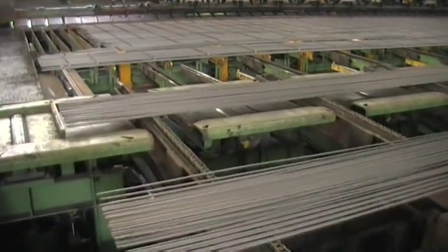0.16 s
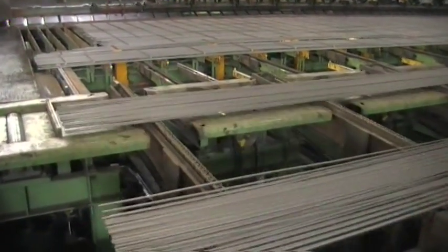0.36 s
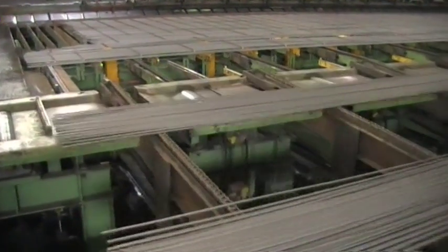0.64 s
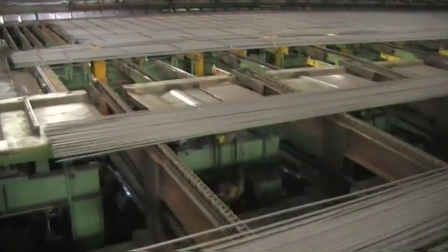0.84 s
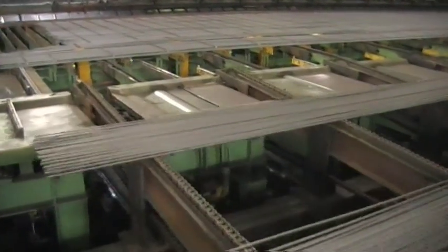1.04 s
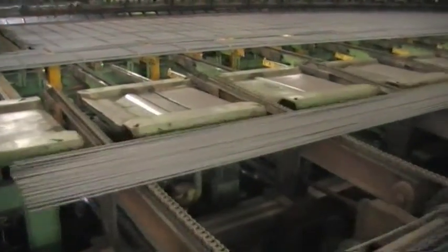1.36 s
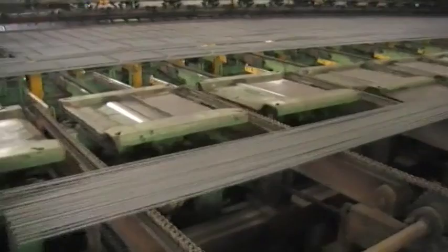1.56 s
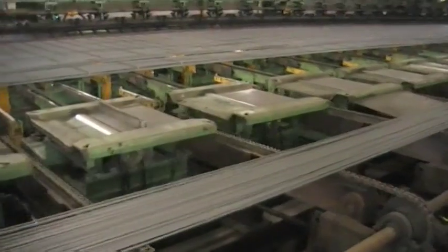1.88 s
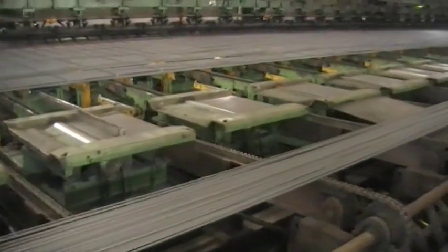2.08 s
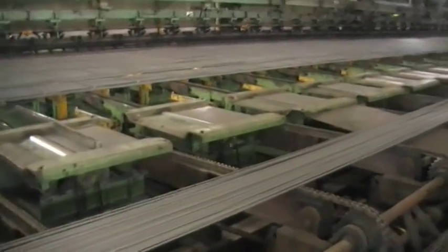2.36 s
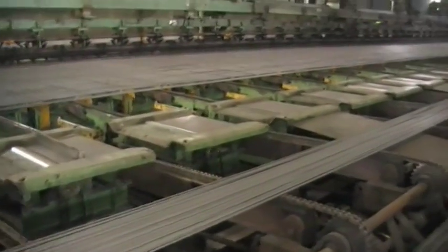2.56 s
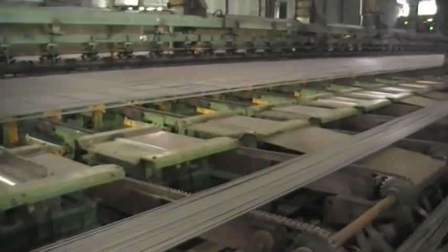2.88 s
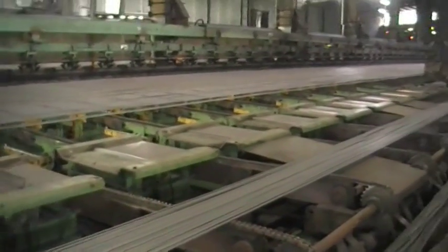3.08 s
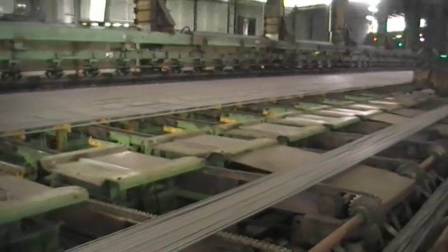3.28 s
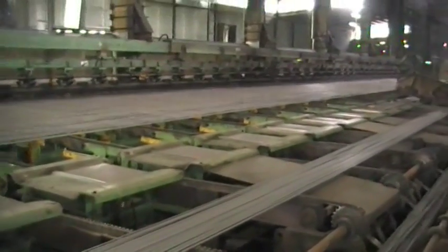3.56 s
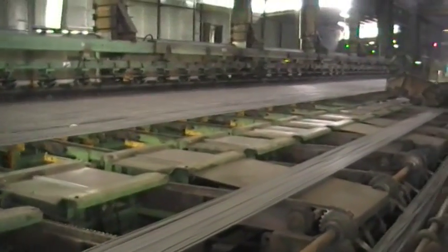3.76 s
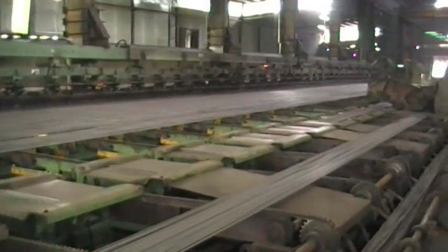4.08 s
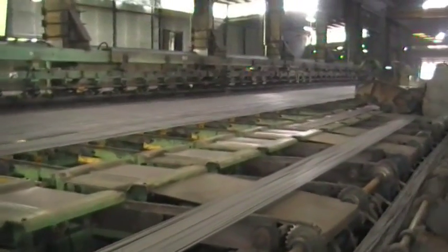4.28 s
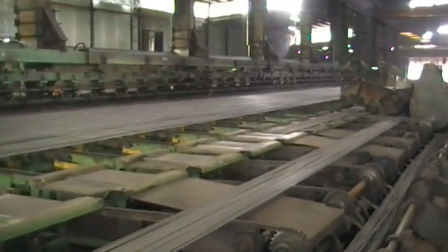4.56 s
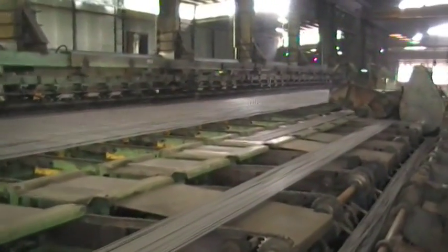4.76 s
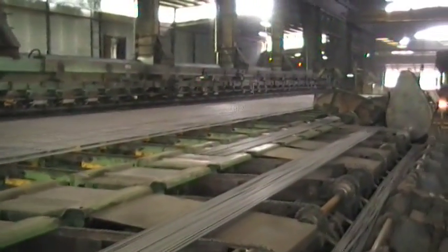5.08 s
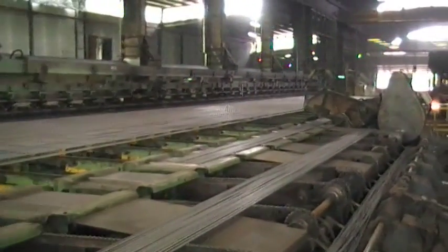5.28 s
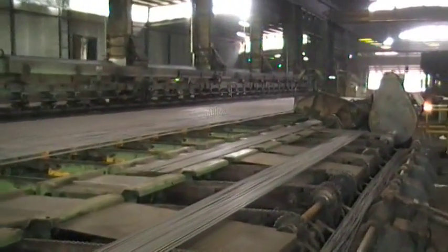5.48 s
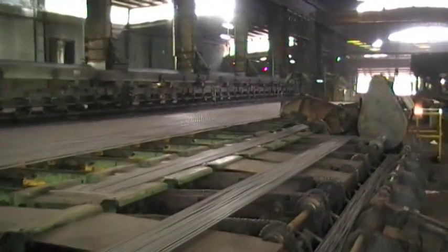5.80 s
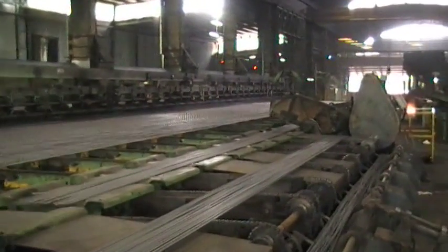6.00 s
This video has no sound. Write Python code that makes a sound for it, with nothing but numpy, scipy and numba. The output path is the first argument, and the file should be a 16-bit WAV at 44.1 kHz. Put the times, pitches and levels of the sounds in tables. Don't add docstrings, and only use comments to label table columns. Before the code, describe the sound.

Heavy factory roar with metallic clanks; an air valve blasts close and distorted around one to two seconds, then a steady high hiss resumes.

```python
import sys
import numpy as np
from scipy import signal
from scipy.fft import rfft, irfft, next_fast_len
from scipy.io import wavfile
from scipy.ndimage import uniform_filter1d
from numba import njit

SR = 44100
rng = np.random.default_rng(int(sys.argv[2]) if len(sys.argv) > 2 else 0)


def bounce(signal):
    frames = np.transpose(np.atleast_2d(signal))
    limited = np.clip(frames, -1, 1)
    pcm = np.round(limited * 32767).astype(np.int16)
    wavfile.write(sys.argv[1], SR, pcm)


def gain_from_db(level_db):
    decades = np.asarray(level_db, float) / 20
    return 10 ** decades


N = 270333
T, M = np.arange(N) / SR, next_fast_len(N)
HZ = np.fft.rfftfreq(M, 1 / SR) + 1

# time_s, level_db
AIR_FLOW = [(0.0, -38.5), (0.23, -35), (0.28, -28), (0.38, -29), (0.43, -25), (0.7, -20), (0.92, -19),
            (1.01, -18), (1.5, -19), (1.72, -18.5), (1.79, -21.5), (1.94, -25.5), (1.96, -21.5),
            (2.17, -32), (2.29, -34.5), (2.82, -22.5), (3.14, -21.5), (6.13, -19.5)]
# time_s, opening (0-1)
VALVE_OPENING = [(0, .05), (.25, 0.35), (.965, 0.54), (.99, 0.99), (1.5, 1), (1.72, 0.85), (1.94, 0.49),
                 (2.25, 0), (6.13, 0.13)]
# time_s, gain_db
RECORDER_GAIN = [(0, 0.5), (.34, 2.5), (.83, 2), (.975, 0), (.995, -8), (1.11, -7.5), (1.4, -7.5),
                 (1.65, -6.5), (1.85, -1.5), (1.92, -1.5), (1.95, -5), (1.965, -1), (2.3, -3), (2.55, -1),
                 (3.1, 1), (4.4, -0.5), (4.6, -0.5), (6.13, 0)]
CLATTER_S = 0.007


def curves(table):
    s, *columns = np.transpose(table)
    return [np.interp(T, s, c) for c in columns]


def on_log(hz, table, axis=1):
    table = np.array(table, float)
    return np.interp(np.log(hz), np.log(table[:, 0]), table[:, axis])


def unit(x):
    return x / np.sqrt(np.mean(x ** 2))


def noise():
    return rng.standard_normal(N)


def walk(rate):
    k = int(SR / rate)
    held = np.repeat(rng.standard_normal(N // k + 1), k)
    return 1.4 * uniform_filter1d(uniform_filter1d(held, k), k)[:N]


@njit
def ring(start, hz, t60, size):
    y = np.zeros(N)
    for k in range(len(start)):
        p = np.exp(2j * np.pi * hz[k] / SR - np.log(1000) / (t60[k] * SR))
        z = size[k] + 0j
        for i in range(max(start[k], 0), min(N, start[k] + int(t60[k] * SR))):
            y[i] += z.imag
            z *= p
    return y


def strike(start_s, hz, t60, size_db):
    start = (start_s * SR).astype(np.int64)
    return ring(start.ravel(), hz.ravel(), t60.ravel(), gain_from_db(size_db).ravel())


def jingle(count, lo_hz, hi_hz, t60, scatter_db):
    u = rng.random((count, 4)).T
    return unit(strike(u[0] * N / SR, lo_hz + (hi_hz - lo_hz) * u[1], t60 * (.5 + u[2]), scatter_db * u[3]))


def bands(x, colour, level_db, shared_db, own_db):
    spectrum = rfft(np.array([x, np.roll(x, N // 2)]), M) * gain_from_db(on_log(HZ, colour))
    spectrum = spectrum / np.sqrt(np.sum(abs(spectrum) ** 2) / N / M)
    out, swell = 0, shared_db * walk(6.8)
    octaves = np.log2(colour[-1][0] / colour[0][0])
    for hz in colour[0][0] * 2 ** np.arange(0, octaves + .5, .5):
        mask = np.clip(1 - 2 * abs(np.log2(HZ / hz)), 0, 1)
        out = out + irfft(spectrum * mask, M)[:, :N] * gain_from_db(level_db(hz) + swell + own_db * walk(10.0))
    return out


def machines():
    # freq_hz, density_db (per Hz)
    drone_colour = [(18, -71), (30, -74), (65, -30.5), (252, -4.5), (425, -4), (482, -5.5), (672, -2.5),
                    (811, -4.5), (1260, -6), (1370, -5), (2400, -6.5), (2960, -8.5), (4400, -7.5),
                    (5720, -17.5), (9680, -120)]
    # centre_hz, level_db, per_gain (dB per dB), per_shake (dB per dB)
    mechanisms = [
        (335, -22.5, 1.9, 0),
        (680, -24, 1.03, .5),
        (1470, -25, 0.94, 0.72),
        (3560, -26, 0.66, 0.33),
    ]
    # time_s, shake_db
    bar_shake = [(0, -1.5), (.33, 0.5), (.39, 7.5), (.92, 3), (1.84, -6), (1.88, 7), (2.02, 14), (2.25, -5),
                 (2.6, -4), (2.97, 1), (3.4, 2.5), (3.83, -3.5), (4.37, 3.5), (4.6, 1.5), (5.16, -3.5),
                 (5.45, 6), (5.77, -3), (6.05, 0)]
    centre_hz, db, per_gain, per_shake = np.transpose(mechanisms)[:, :, None]
    layers = db + per_gain * curves(RECORDER_GAIN)[0] + per_shake * curves(bar_shake)[0]
    layers[3] += 0.42 * (curves(AIR_FLOW)[0] + 21) + 7.5 * curves(VALVE_OPENING)[0] ** 3

    def level_db(hz):
        shares = [np.interp(np.log(hz), np.log(centre_hz[:, 0]), row) for row in np.eye(4)]
        return shares @ layers

    source = noise() + 0.33 * jingle(count=6000, lo_hz=301.7, hi_hz=5467, t60=0.18, scatter_db=1.5)
    return bands(source, drone_colour, level_db, 1.0, 0.079)


def clanks(count=60):
    # start_s, peak_db, main_hz, crack_db (above 2.5 kHz)
    free_blows = [(0.114, -21, 640, -7), (0.359, -15, 1004, -13), (0.379, -10, 1325, -7.5),
                  (0.459, -16.5, 1480, -3), (0.549, -14, 1340, -6), (1.864, -11, 1028, -9),
                  (1.888, -6.5, 1165, -18), (1.964, -13, 1600, -9), (1.957, -5.5, 980, -10),
                  (2.009, -11, 734, -13), (2.034, -16, 930, -20), (2.976, -11.5, 686, -13),
                  (3.199, -16, 723, -3), (3.361, -11, 1480, -15), (3.409, -12, 1320, -10),
                  (3.439, -14, 616, -19), (4.118, -15.5, 720, -9), (4.199, -13.5, 640, -21),
                  (4.374, -11.5, 1380, -5), (4.459, -11.5, 576, -19), (4.519, -13.5, 652, -18),
                  (5.943, -15, 865, -6), (6.039, -16, 557, -9)]
    # start_s, peak_db, main_hz, crack_db (above 2.5 kHz)
    loaded_blows = [(0.489, -18, 734, -11), (1.989, -6, 1550, -9), (2.577, -15.5, 1660, -8.5),
                    (2.782, -15, 1260, -5), (2.799, -13.5, 1125, -10), (3.387, -9, 2080, -10),
                    (3.748, -6.5, 1805, -20), (4.089, -15.5, 766, -7), (4.359, -13, 1680, -4),
                    (5.283, -12, 657, -27), (5.369, -17, 750, -17), (5.419, -17, 590, -16),
                    (5.519, -15, 715, -5), (5.679, -17, 2030, -23.5)]
    s, db, hz, crack_db = np.transpose(free_blows + loaded_blows)[:, :, None]
    t60 = np.repeat([0.15, 0.082], [len(free_blows), len(loaded_blows)])[:, None]
    u = rng.random((len(s), 3, count))
    frame_hz = 560 * 17. ** ((np.arange(count) + u[:, 0]) / count)
    apart_db = 3.85 * abs(np.log2(np.minimum(frame_hz, 2500) / hz))
    bright_db = np.clip(np.log2(frame_hz / 1800), 0, 1) * (crack_db + 8.5)
    size_db = np.c_[db - 11.5, db - 14 - apart_db + bright_db - 8 * u[:, 1]]
    modes_hz = np.c_[hz, frame_hz]
    decay_s = t60 * (hz / modes_hz) ** 0.18
    start_s = s + np.c_[0 * s, CLATTER_S * u[:, 2] ** 2]
    blows = strike(start_s, modes_hz, decay_s, size_db)
    return signal.sosfilt(signal.butter(2, 300, "high", fs=SR, output="sos"), blows)


def thuds(count=8):
    # start_s, level_db
    floor_blows = [
        (3.39, -31),
        (3.749, -22),
        (4.36, -28),
    ]
    s, db = np.transpose(floor_blows)[:, :, None]
    u = rng.random((len(s), 2, count))
    hz = 210 * 3.34 ** ((np.arange(count) + u[:, 0]) / count)
    beams = strike(s + CLATTER_S * u[:, 1], hz, 0.055 + 0 * hz, db + 0 * hz)
    return signal.sosfilt(signal.butter(4, 180, "high", fs=SR, output="sos"), beams)


def pings():
    # start_s, start_hz, end_hz, level_db, length_s
    squeaks = [(.225, 10400, 11000, -39, .025), (0.286, 3070, 3100, -29, 0.037),
               (.487, 15400, 14600, -40, .04), (0.98, 4300, 4330, -26, 0.016),
               (1.624, 1694, 1697, -37, 0.256), (2.02, 4650, 4560, -32, 0.028),
               (2.03, 6200, 6050, -36, 0.023), (2.023, 7500, 7440, -27, .03),
               (2.077, 7800, 7750, -27, 0.026), (2.081, 5150, 5150, -31, 0.028),
               (3.36, 3000, 3000, -24, .012), (3.361, 2450, 2500, -25, .014),
               (3.387, 2670, 2700, -23, 0.027), (5.668, 2000, 1960, -29, 0.031),
               (5.673, 2550, 2580, -32, .03), (5.942, 850, 820, -30, 0.085)]
    out, waver_hz = np.zeros(N), 30 * walk(70)
    for s, hz0, hz1, db, length in squeaks:
        u = np.clip((T - s) / length, 0, 1)
        hz = hz0 + (hz1 - hz0) * u + waver_hz
        envelope = np.sqrt(2) * np.sin(np.pi * u ** 0.5)
        out += gain_from_db(db) * envelope * np.sin(2 * np.pi * np.cumsum(hz) / SR)
    return out


def hiss():
    # freq_hz, density_db (per Hz)
    jet_colour = [(2710, -51), (4600, -10.5), (5230, -5), (6340, -0.5), (7830, -1), (13300, -26.5),
                  (14900, -35), (15600, -28), (15800, -69)]
    # start_s, rise_db, decay_s
    valve_spits = [
        (0.952, 8, 0.0047),
        (.982, 2.5, 0.01),
        (1.80, 4, 0.025),
    ]
    shut_top_db, open_top_db = -25, -9
    flow_db = curves(AIR_FLOW)[0]
    top_db = shut_top_db + (open_top_db - shut_top_db) * curves(VALVE_OPENING)[0]
    spit_db = sum(db * np.exp(-np.maximum(T - s, 0) / decay) * (T >= s) for s, db, decay in valve_spits)

    def level_db(hz):
        tilt = np.clip(np.log2(hz / 7000) / 0.75, -.4, 1.75)
        return flow_db + spit_db + 1.04 + tilt * (top_db + 19.5 + .5 * spit_db)

    bars = jingle(count=12000, lo_hz=3498, hi_hz=15940, t60=0.075, scatter_db=-20)
    return bands(0.93 * noise() + 0.34 * bars, jet_colour, level_db, 0.1, 0.59)


def hums():
    # pitch_hz, width_hz, level_db
    gearbox = [
        (301.4, 51, -41.5),
        (614, 30, -42),
        (1080, 24, -50),
    ]
    shape = sum(gain_from_db(db) / np.sqrt(width) / (1 + (2 * (HZ - hz) / width) ** 2) for hz, width, db in gearbox)
    hum = irfft(rfft(noise(), M) * shape * np.sqrt(SR / 1.6), M)[:N]
    return hum * gain_from_db(1.4 * curves(RECORDER_GAIN)[0])


def tail(t60, length):
    t = np.arange(int(length * SR)) / SR
    x = rng.standard_normal(len(t)) * 1000. ** (-t / t60)
    return x / np.sqrt(np.sum(x ** 2))


def hall(blows):
    delay = np.zeros(int(.012 * SR))
    echo = [signal.fftconvolve(blows, np.r_[delay, tail(t60=0.92, length=1.)])[:N] for _ in range(2)]
    return gain_from_db(-4.5) * np.array(echo)


def port_side(mid, scattered):
    # freq_hz, side_db (re mid), behind (share a quarter turn behind), in_step (share)
    port_pair = [(60, -2, .6, .3), (130, -4.5, .9, 0.38), (300, -10.5, 0.94, 0), (700, -15.5, 0.14, -0.28),
                 (1500, -17, 0.44, -0.052), (3000, -13.5, 1, 0.13), (5000, -13.5, 0.6, 0.038),
                 (6500, -14.5, .7, 0.27), (7800, -9, .6, .3), (9000, 1, 0.34, 0), (10000, 0, .45, -.3),
                 (12000, -5, .35, -0.37), (15000, -5, 0, -0.054)]
    behind, in_step = on_log(HZ, port_pair, axis=2), on_log(HZ, port_pair, axis=3)
    rest = np.sqrt(np.clip(1 - behind ** 2 - in_step ** 2, 0, 1))
    spectrum = (in_step - 1j * behind) * rfft(mid, M) + rest * rfft(scattered, M)
    return irfft(gain_from_db(on_log(HZ, port_pair)) * spectrum, M)[:N]


def overload():
    # freq_hz, density_db (per Hz)
    fuzz_colour = [(15, -53), (25, -27), (104, -17), (311, -6), (392, -4), (429, -6), (816, -2), (958, -3),
                   (1100, -1.5), (6000, -10), (7800, -39), (13200, -120)]
    from_s, attack_s, hold_s, release_s = 0.954, 0.037, .5, 0.35
    rise = np.clip(1 - (T - from_s) / attack_s, 0, 1)
    fall = np.clip((T - from_s - hold_s) / release_s, 0, 1.3)
    fuzz_db = -25.5 - 35 * rise - 27.0 * fall ** 3
    return bands(noise(), fuzz_colour, lambda hz: fuzz_db, 0.74, 0.68)


def scene():
    blows = clanks()
    mid, scattered = machines() + hiss() + hall(blows)
    mid = mid + blows + pings() + thuds() + hums()
    side = port_side(mid, scattered)
    fuzz = overload()
    mid = mid + gain_from_db(-9.0) * fuzz[1]
    side = side + gain_from_db(-16.5) * blows + fuzz[0]
    return np.array([mid + side, mid - side])


def top_cut(x):
    return signal.sosfilt(signal.butter(12, 16060, fs=SR, output="sos"), x)


def record(dry):
    # start_s, level_db
    gain_steps = [(.005, -46), (.375, -48), (.985, -50), (1.06, -51), (1.21, -53), (1.3, -56), (1.47, -57),
                  (1.68, -48), (1.885, -45), (1.96, -37), (3.365, -54), (3.75, -58)]
    s, db = np.transpose(gain_steps)
    thump = strike(s, 35 + 0 * s, 0.069 + 0 * s, db)
    return top_cut(np.tanh(0.62 * dry) / 0.69 + thump)


dry = scene()
out = record(dry)
bounce(out)
```